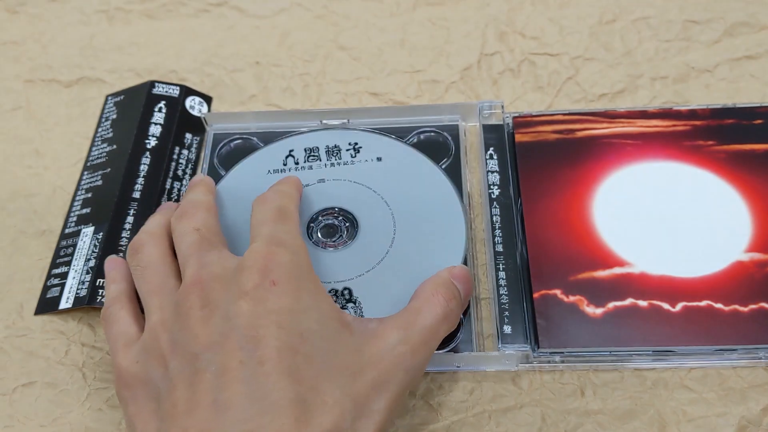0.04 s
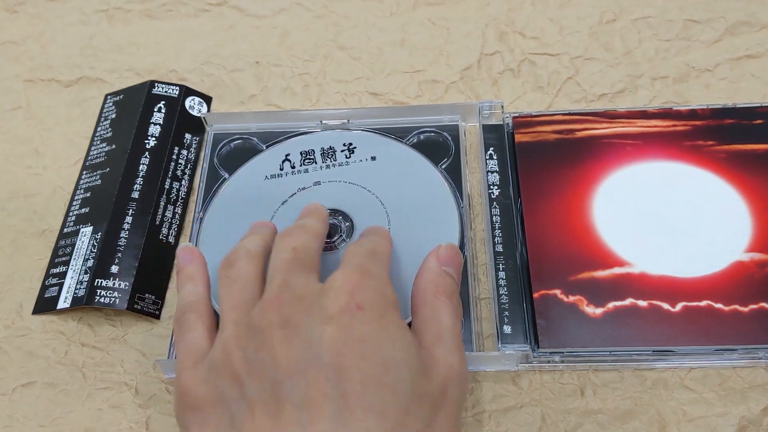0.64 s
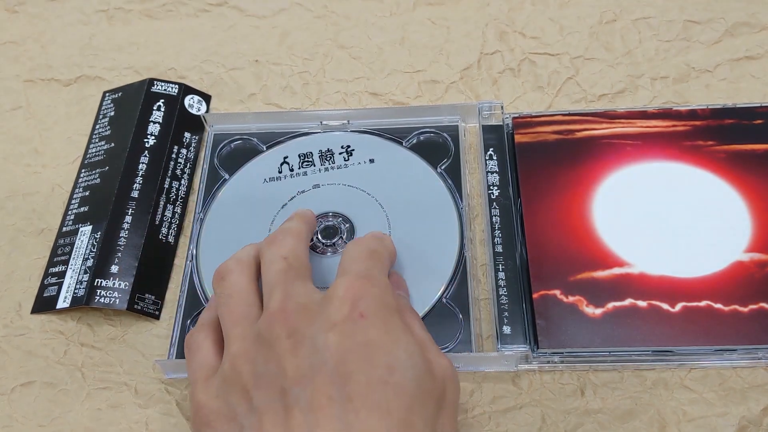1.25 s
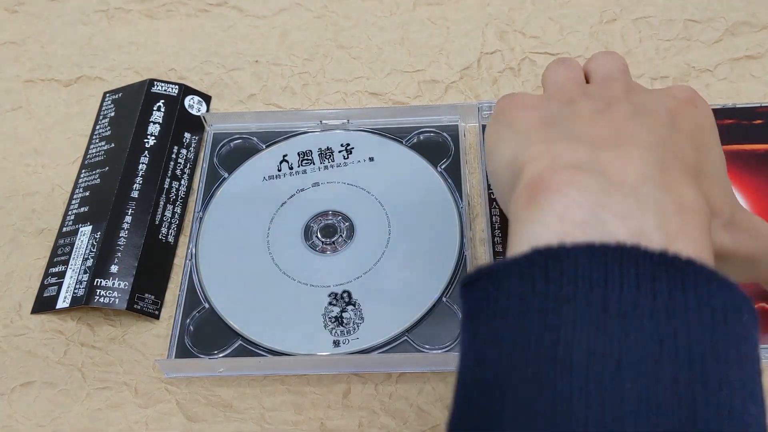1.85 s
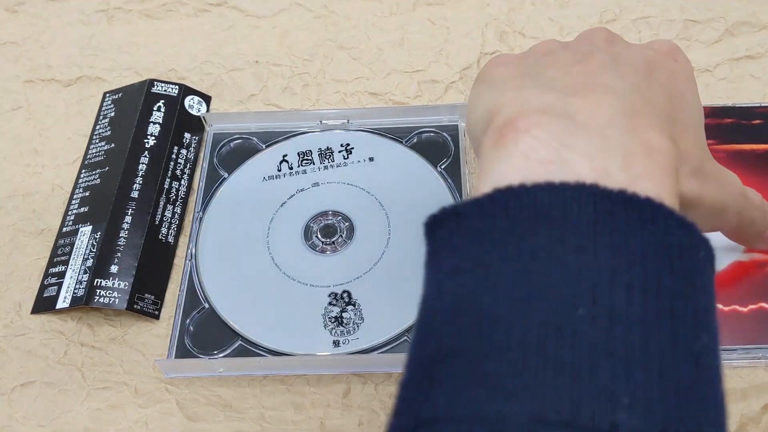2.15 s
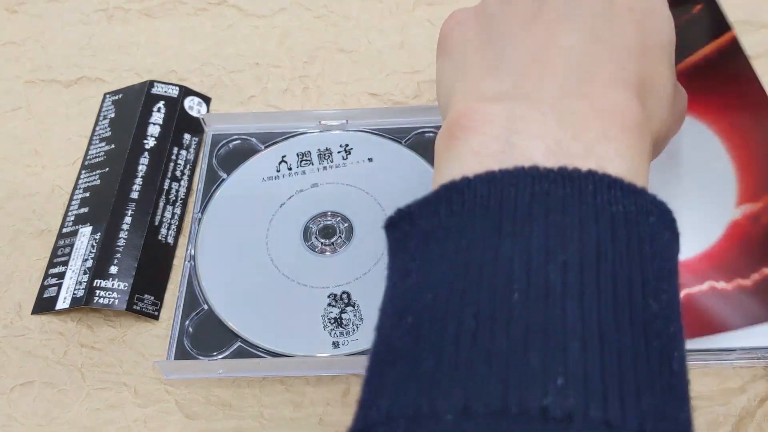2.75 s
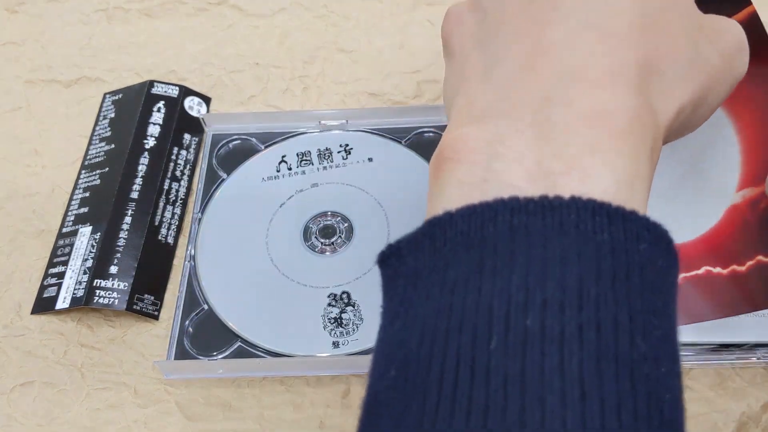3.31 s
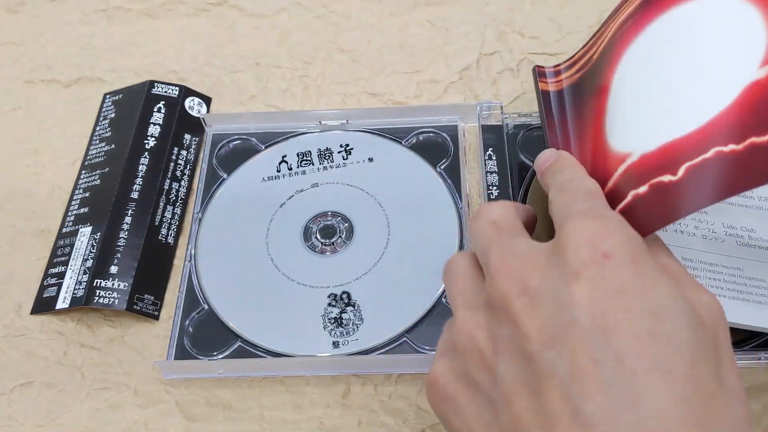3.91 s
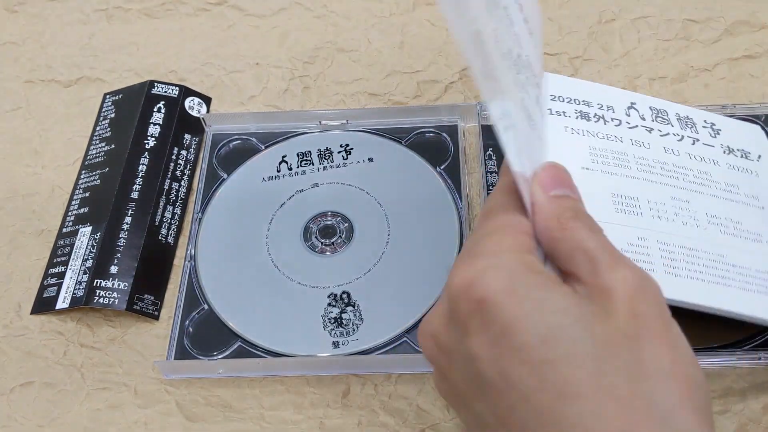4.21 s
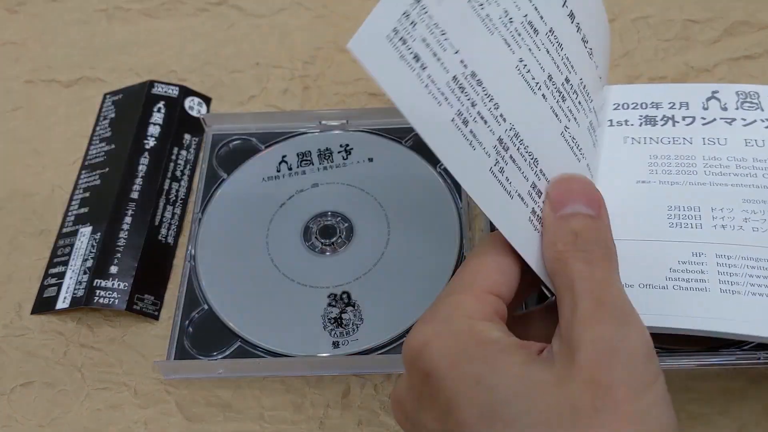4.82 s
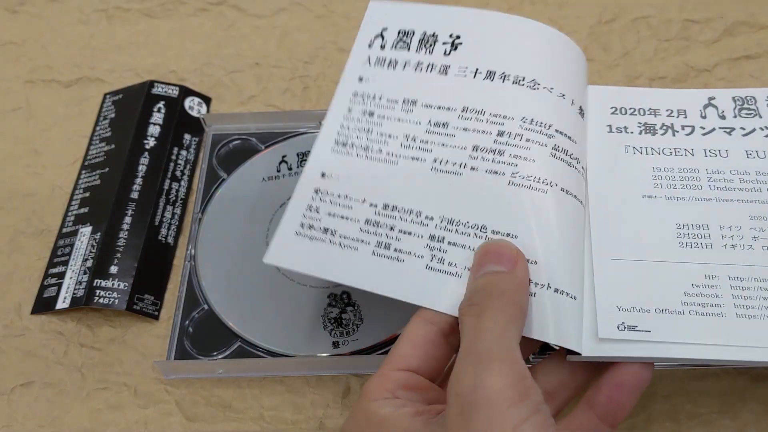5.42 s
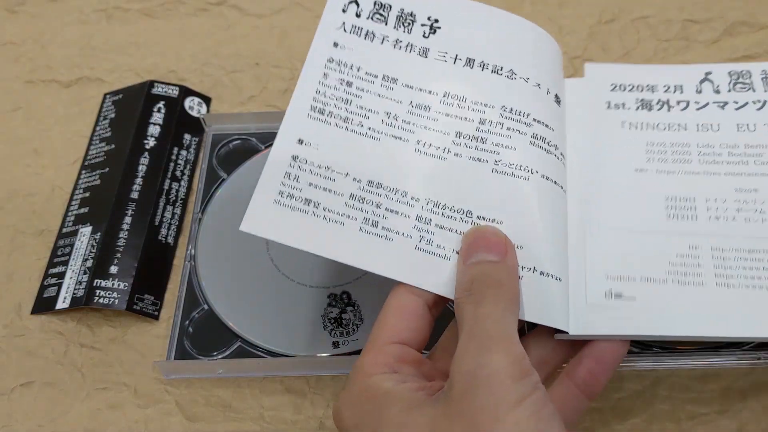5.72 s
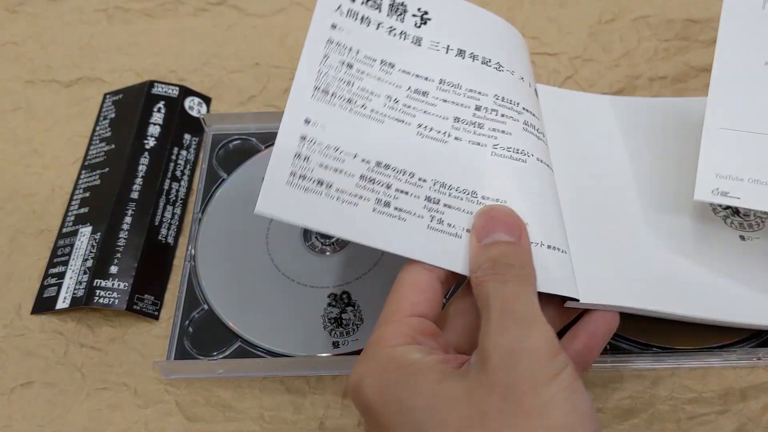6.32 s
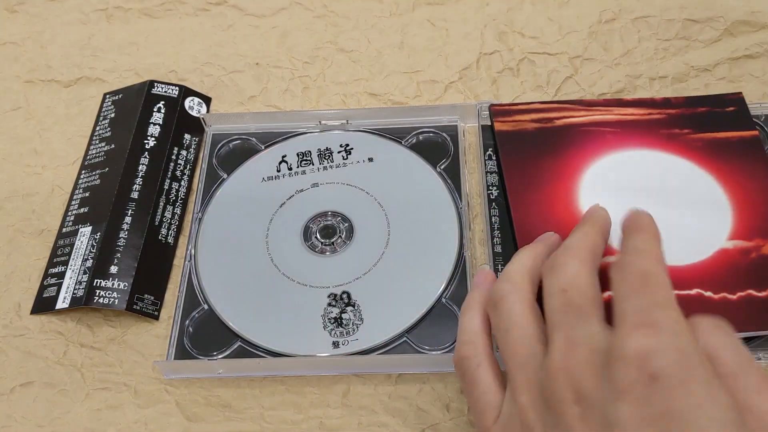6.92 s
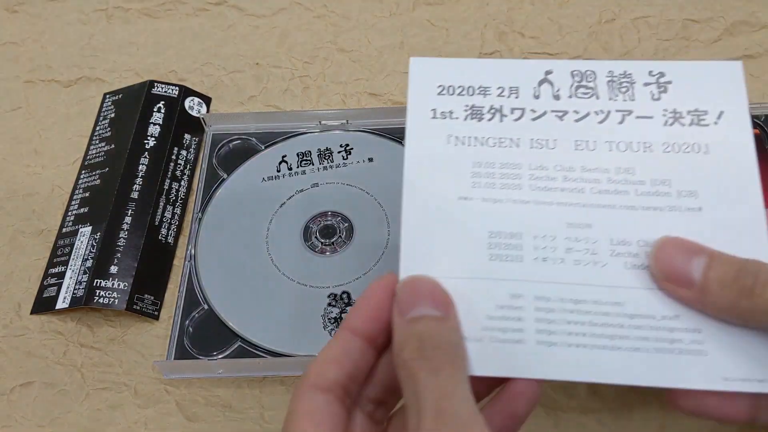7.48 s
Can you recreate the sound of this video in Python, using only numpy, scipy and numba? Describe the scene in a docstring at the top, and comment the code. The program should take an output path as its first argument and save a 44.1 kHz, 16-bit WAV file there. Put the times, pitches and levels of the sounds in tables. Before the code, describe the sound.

Fingers click a disc into a plastic case, then slide out a paper booklet and turn its stiff pages over a faint hum.

```python
"""Hands on an open plastic disc case, close up in a small room with a faint hum.
Fingers press the disc onto its hub with sharp clicks; near 1 s it snaps home and chatters in the tray.
From about 2 s the booklet slides out from under its tabs, card edges rasping, glossy faces hissing.
Then, to the end, the hands leaf through it: stiff pages rub, buckle and snap."""
import sys
import numpy as np
from scipy import signal
from scipy.fft import rfft, irfft, next_fast_len
from scipy.io import wavfile
from scipy.ndimage import uniform_filter1d
from numba import njit

SR = 44100
rng = np.random.default_rng(int(sys.argv[2]) if len(sys.argv) > 2 else 0)


def file_out(sig):
    """Save sig as 16-bit WAV at sys.argv[1]."""
    # one column per channel
    cols = np.atleast_2d(sig).T
    # limit, then scale
    lim = np.clip(cols, -1, 1)
    pcm = np.round(lim * 32767).astype(np.int16)
    wavfile.write(sys.argv[1], SR, pcm)


N = 332955

# edges of the four contact bands (frequency [Hz])
BAND_LIMITS_HZ = [250, 700, 1600, 4000, 8200]


def case_clicks():
    """Hard plastic contacts ring the disc in its tray; the low pop near 3.4 s is a page flapping."""
    # (time [s], level [dB], tilt [dB/oct], ring t60 [s], pitch of struck spot [Hz])
    clicks = [(.0443, -43, -2, .025, 3190), (.426, -31.5, 3, .034, 3270), (.4367, -35.5, -4.5, 0.023, 1770),
              (.4475, -43, 1.5, .016, 2900), (.475, -38, 0.5, .028, 1550), (.481, -39, -2, .03, 1350),
              (.7668, -42, 4.5, .012, 3440), (.9249, -43.5, 5, .005, 4260), (1.0423, -25, -1, .023, 1600),
              (1.0438, -21, -.2, .025, 3380), (1.0496, -26, 0, .036, 3440), (1.1094, -44, -3, .018, 3500),
              (1.1348, -52, -3, .013, 3520), (1.189, -28, -0.7, .0095, 1520), (1.1974, -38, 2, .025, 2150),
              (1.9353, -41.5, 4, .0045, 4530), (2.107, -47, 8, .008, 5600), (2.1492, -45, 4, .008, 4200),
              (2.1672, -50, 4, .008, 4800), (2.4581, -41, -4, .035, 2900), (2.6888, -39.5, 5.5, .01, 3900),
              (2.9034, -42, 0, .01, 5560), (3.2281, -36.5, -5, .014, 1930), (3.399, -38, -2, .055, 775),
              (3.416, -32.5, 5.5, .05, 2710), (3.4247, -36.5, -8, .04, 2500), (6.857, -46, 4, .018, 3400),
              (6.8655, -44, 0.5, .012, 4870)]
    # disc in tray (frequency [Hz], level [dB], loose-grip t60 [s])
    modes = [(291, -15.5, 0.1), (897, -9, 0.066), (1600, -2.5, 0.04), (1665, -8.5, 0.072),
             (2520, -3.5, 0.049), (2800, -27, 0.096), (3214, -7, 0.078), (3540, -7.5, 0.032),
             (3570, -6, 0.04), (4100, -2, 0.028), (5410, -7.5, 0.054), (5540, -13, 0.032), (6120, -12, .04)]
    # radiation of plastic per band (level [dB])
    tone_db = [-7, 0.5, 5.5, 3.3]
    return contacts(clicks, tone_db, lift_db=8, width_oct=0.49, modes=modes,
                    crack_db=-1, spot_db=-4, modes_db=-4, detune=0.0078, yield_s=0.0001)


def paper_snaps():
    """Stiff pages buckle, flap and tap, softer than the plastic."""
    # (time [s], level [dB], tilt [dB/oct], ring t60 [s], pitch of buckling patch [Hz])
    snaps = [(2.4012, -29, -1.5, 0.055, 2355), (2.4086, -27, -1.5, 0.017, 2650),
             (2.777, -36, 2, .049, 2770), (2.926, -30.5, 4.5, 0.046, 3340), (3.221, -44.5, 5, 0.025, 3360),
             (3.2552, -42, -3.5, 0.063, 3670), (3.5813, -31, -2.5, 0.034, 2490),
             (3.6642, -43.5, -.5, 0.022, 1430), (3.695, -37.5, 0, 0.023, 776),
             (3.9011, -46.5, 11, .069, 2260), (3.9568, -46, 1.5, .035, 760), (4.0765, -46.5, 0, .017, 900),
             (4.1099, -44.5, 6, .024, 2560), (4.7422, -40, -6.5, .025, 1070), (4.7612, -34, -5, 0.057, 917),
             (4.7786, -33.5, -8.5, 0.044, 955), (4.9935, -43, -4.5, .02, 810), (5.0086, -45, -3, .02, 1130),
             (5.0284, -42, -0.5, 0.006, 666), (5.225, -43, -0.5, 0.02, 640), (5.2742, -44, 1, 0.029, 730),
             (5.3795, -25.5, -1.5, 0.01, 955), (5.3838, -20, -.5, .019, 1070),
             (5.388, -35, -2, 0.064, 2330), (5.8969, -48, 2, 0.034, 1250), (6.2861, -35, 1, 0.034, 1150),
             (6.3862, -31, 0, 0.04, 1073), (6.4223, -46, 8.5, .016, 2460), (6.4622, -43, 5, .019, 2540),
             (6.5227, -41.5, 5, 0.018, 2210), (6.6544, -40, 3, 0.066, 2500),
             (6.671, -22.5, 0.6, 0.0077, 970), (6.681, -30, 2.5, .05, 1266), (6.697, -33.5, 0.5, .032, 714),
             (6.8104, -49, 6, .03, 2410), (7.292, -42, 2.7, 0.081, 940), (7.341, -35, -5, 0.031, 1500),
             (7.3465, -37.5, -3, 0.045, 1095)]
    # hand-held booklet (frequency [Hz], level [dB], loose-grip t60 [s])
    modes = [(490, -13.5, 0.025), (714, -2.5, 0.015), (940, 6.5, 0.036), (970, -12.5, 0.11),
             (1110, -13, 0.015), (1190, -8, 0.022), (1413, 0, 0.046), (2100, -11.5, .03),
             (2570, -4.5, 0.026), (3240, 7.5, 0.042), (4330, 6, 0.034), (4860, -9, .02)]
    # radiation of paper per band (level [dB])
    tone_db = [-3.2, 0, -0.5, -4.5]
    return contacts(snaps, tone_db, lift_db=13.5, width_oct=1.26, modes=modes,
                    crack_db=-4.5, spot_db=-9.5, modes_db=-13, detune=0.04, yield_s=0.0011)


def contacts(table, tone_db, lift_db, width_oct, **material):
    """Contacts on one object; spectrum = material tone + hardness tilt + lift at the contact's pitch."""
    edges_hz = np.array(BAND_LIMITS_HZ)
    centres_hz = np.sqrt(edges_hz[1:] * edges_hz[:-1])
    out = np.zeros(N + SR)
    for time_s, level_db, tilt_db_per_oct, ring_s, spot_hz in table:
        octaves = np.log2(centres_hz / spot_hz)
        focus_db = lift_db * np.exp(-(octaves / width_oct) ** 2)
        shape_db = np.array(tone_db) + tilt_db_per_oct * octaves + focus_db
        band_db = level_db + shape_db - 10 * np.log10(np.sum(undb(shape_db) ** 2))
        hit = shape_bands(impact(ring_s, spot_hz, **material), band_db)
        start = int(time_s * SR)
        out[start:start + len(hit)] += hit
    return out[:N]


def impact(ring_s, spot_hz, modes, crack_db, spot_db, modes_db, detune, yield_s):
    """One contact: crack, dense short ring, pitch of the struck spot, modes of the object."""
    t = np.arange(8192) / SR
    looseness = ring_s / 0.03
    fade = undb(-60 * t / ring_s)
    onset = 1 - np.exp(-t / (yield_s * looseness ** 2))  # soft, loose things give way slowly
    dense = rng.standard_normal(len(t)) * fade * onset
    spot = np.sin(2 * np.pi * spot_hz * t) * fade ** 1.75 * onset
    modal = 0
    for hz, db, t60_s in modes:
        hz = hz * (1 + detune * rng.standard_normal())  # each grip retunes
        decay = undb(db - 60 * t / (t60_s * min(looseness, 1)))  # a firm grip damps
        modal = modal + decay * np.sin(2 * np.pi * (hz * t + rng.random()))
    crack = unit(signal.unit_impulse(len(t))) / looseness ** 0.53  # stiff contacts crack more
    return unit(dense) + undb(crack_db) * crack + undb(spot_db) * unit(spot) + undb(modes_db) * unit(modal)


def sliding():
    """Card edges rasp under the tabs; glossy faces and fingertips hiss."""
    # skin and paper strokes (start [s], length [s], rasp [dB], hiss [dB])
    strokes = [(.16, 0.047, -51.5, -57), (.39, 0.14, -53.5, -64), (.71, 0.1, -52.5, -52),
               (.82, .34, -58, -55), (1.46, 0.087, -59.5, -51.5), (1.6, 0.31, -55.5, -53),
               (1.94, 0.29, -49.5, -47), (2.21, 0.14, -45.5, -44.5), (2.44, 0.17, -46.5, -55),
               (2.65, 0.041, -46.5, -49), (2.8, 0.085, -49, -41.5), (2.9, 0.22, -49.5, -48.5),
               (3.24, 0.038, -45.5, -47), (3.46, .07, -53, -50.5), (3.535, 0.037, -41.5, -40.5),
               (4.06, 0.04, -50, -54), (4.66, .06, -58, -53.5), (4.87, 0.071, -61, -48),
               (5.19, 0.05, -61, -54), (5.81, 0.091, -59, -52.5), (6.04, .085, -51.5, -45),
               (6.268, 0.033, -49, -40.5), (7.05, 0.25, -66, -69)]
    # card resonance, lower as more comes free (time [s], frequency [Hz])
    card_pitch = [(2.0, 3810), (2.3, 5370), (2.42, 3520), (2.62, 2740), (2.8, 2680), (3.05, 2270),
                  (3.55, 2530)]
    # edge rasp (frequency [Hz], level [dB])
    rasp_spectrum = [(300, -19.5), (900, -4), (1600, 5), (2300, 5), (4000, 1), (5000, 0), (8000, -5.5)]
    # face hiss (frequency [Hz], level [dB])
    hiss_spectrum = [(1200, -11), (3000, -26), (4200, -5), (5500, -4.5), (6500, -6), (8000, -8.5)]
    rasp_gain, hiss_gain = gestures(strokes, attack_s=0.01, release_s=0.027)
    pitch_hz = np.interp(np.arange(N) / SR, *np.transpose(card_pitch))
    rasp = colour(friction(rate_hz=1300, spread_db=3.5, smooth_db=-1, judder_db=2.5), rasp_spectrum)
    rasp = unit(resonance(rasp, pitch_hz, q=1.8))
    hiss = colour(friction(rate_hz=2500, spread_db=4, smooth_db=-2.5, judder_db=2.5), hiss_spectrum)
    rasp_floor, hiss_floor = undb(-73.5), undb(-64.5)  # hands never lie quite still
    return rasp * np.hypot(rasp_gain, rasp_floor) + hiss * np.hypot(hiss_gain, hiss_floor)


def page_creaks():
    """A bending page slips in small steps that the whole sheet radiates."""
    # page bends (start [s], length [s], level [dB])
    bends = [(4.745, 0.032, -42.5), (4.94, 0.059, -51), (5.12, .1, -47), (6.03, 0.059, -50),
             (6.24, 0.036, -47), (6.365, 0.055, -44), (6.69, 0.089, -49), (7.29, 0.016, -40),
             (7.345, 0.017, -49)]
    # sheet radiation (frequency [Hz], level [dB])
    spectrum = [(150, -22.5), (330, -6), (600, -8), (850, 2.5), (1250, -3.5), (1550, -12), (2000, -19.5),
                (4000, -27)]
    gain, = gestures(bends, attack_s=0.0077, release_s=0.016)
    return colour(friction(rate_hz=450, spread_db=1.5, smooth_db=-5, judder_db=2), spectrum) * gain


def disc_chatter(start_s=1.051, level_db=-36, fade_db_per_s=148):
    """The seated disc buzzes against the tray in quick, fading knocks."""
    # tray response (frequency [Hz], level [dB])
    spectrum = [(150, -23), (290, 6), (450, 4.5), (850, 2.5), (1150, -5), (1650, -12), (2200, -9),
                (3400, 1), (4200, -8), (8000, -13)]
    age_s = np.maximum(np.arange(N) / SR - start_s, 0)
    gain = gesture(start_s, length_s=0.09, attack_s=0.003, release_s=0.02)
    gain *= undb(level_db - fade_db_per_s * age_s)
    return colour(friction(rate_hz=700, spread_db=4, smooth_db=-6, judder_db=4), spectrum) * gain


def friction(rate_hz, spread_db, smooth_db, judder_db):
    """Stick-slip: tiny uneven catches over a smooth rub, under unsteady pressure."""
    sizes = undb(spread_db * np.minimum(rng.exponential(size=N), 5))
    catches = (rng.random(N) < rate_hz / SR) * rng.choice([-1, 1], N) * sizes
    rub = undb(smooth_db) * rng.standard_normal(N)
    pressure = undb(judder_db * wander(60))
    return (unit(catches) + rub) * pressure


def table_rumble():
    """Soft thumps on the table send a deep, soft rumble."""
    # table thumps (start [s], length [s], level [dB])
    thumps = [(1.39, 0.085, -40.5), (1.8, .28, -46), (4.25, .85, -50)]
    # rumble (frequency [Hz], level [dB])
    spectrum = [(12, -2), (25, 0.5), (45, -1.5), (70, -13), (130, -25.5), (300, -55), (1000, -77)]
    gain, = gestures(thumps, attack_s=0.05, release_s=0.09)
    return colour(rng.standard_normal(N), spectrum) * gain


def room(x, t60_s, wet_db, build_s, echo_s, echo_db):
    """Direct sound, one echo off the nearest wall and a diffuse tail."""
    # room response (frequency [Hz], level [dB])
    spectrum = [(120, -14), (350, -1), (700, 3), (1000, -4.5), (1500, -1), (3000, -5.5), (5500, -6),
                (8000, 0)]
    t = np.arange(SR // 2) / SR
    build = 1 - np.exp(-(t / build_s) ** 2)
    tail = colour(rng.standard_normal(len(t)), spectrum) * undb(-60 * t / t60_s) * build
    echo = uniform_filter1d(signal.unit_impulse(len(t), int(echo_s * SR)), size=5)
    response = undb(wet_db) * tail / np.sqrt(np.sum(tail ** 2)) + undb(echo_db) * echo
    return x + signal.fftconvolve(x, response)[:N]


def mains_hum(waver_db):
    """Two faint mains harmonics, each wavering in level."""
    # harmonics (frequency [Hz], level [dB])
    partials = [(100, -55), (200, -65)]
    t = np.arange(N) / SR
    hum = 0
    for hz, db in partials:
        amplitude = np.sqrt(2) * undb(db + waver_db * wander(3.4))
        hum = hum + amplitude * np.sin(2 * np.pi * (hz * t + rng.random()))
    return hum


def air_noise(level_db):
    """Steady air noise with a low rumble."""
    # room air (frequency [Hz], level [dB])
    spectrum = [(20, -1), (42, 1.5), (65, -7), (100, -4), (140, -4.5), (200, -11.5), (260, -14.5),
                (450, -18.5), (850, -20.5), (1400, -22), (2500, -24), (4200, -26.5), (6000, -32.5),
                (8000, -36.5)]
    return undb(level_db) * colour(rng.standard_normal(N), spectrum)


def gestures(table, attack_s, release_s, swell_db=3.5):
    """One gain curve per level column; a hand is fastest and loudest midway; overlaps add in power."""
    t, power = np.arange(N) / SR, 0
    for start_s, length_s, *levels_db in table:
        speed = np.sin(np.pi * np.clip((t - start_s) / length_s, 0, 1))
        gain = gesture(start_s, length_s, attack_s, release_s) * undb(swell_db * (speed - 2 / np.pi))
        power = power + np.outer(undb(levels_db), gain) ** 2
    return np.sqrt(power)


def gesture(start_s, length_s, attack_s, release_s):
    """Gain of one movement: rise, hold, decay."""
    t = np.maximum(np.arange(N) / SR - start_s, 0)
    return (1 - np.exp(-t / attack_s)) * np.exp(-np.maximum(t - length_s, 0) / release_s)


def shape_bands(x, band_db):
    """Smooth causal filter: brings each band's energy, spread over 10 ms, to band_db."""
    size = len(x)
    spectrum = rfft(x)
    hz = np.maximum(np.arange(size // 2 + 1) * SR / size, 1)
    bands = list(zip(BAND_LIMITS_HZ, BAND_LIMITS_HZ[1:]))
    log_corners = np.log([corner for lo, hi in bands for corner in (lo * 1.35, hi / 1.08)])
    # small objects radiate little bass, soft contacts little treble
    rolloff_db = np.interp(np.log(hz), np.log([60, 330, 5500, 8000]), [-19, 0.5, -0.5, -7.5])
    log_gain = np.log(undb(rolloff_db))
    for _ in range(2):
        power = 2 * np.abs(spectrum * np.exp(log_gain)) ** 2 / size / (SR / 100)
        band_rms = np.sqrt([power[(hz >= lo) & (hz < hi)].sum() for lo, hi in bands])
        log_step = np.log(undb(band_db) / band_rms)
        log_gain += np.interp(np.log(hz), log_corners, np.repeat(log_step, 2))
    cepstrum = irfft(log_gain)[:size // 2]
    cepstrum[1:] *= 2  # minimum phase
    return irfft(spectrum * np.exp(rfft(cepstrum, size)))


@njit
def resonance(x, hz, q):
    """State-variable band-pass, moving centre, unity peak gain."""
    y, band_state, low_state = np.empty(len(x)), 0., 0.
    for i in range(len(x)):
        g = np.tan(np.pi * hz[i] / SR)
        band = (band_state + g * (x[i] - low_state)) / (1 + g * (g + 1 / q))
        band_state = 2 * band - band_state
        low_state += 2 * g * band
        y[i] = band / q
    return y


def colour(x, points):
    """Filter by (frequency [Hz], level [dB]) points; rms 1."""
    hz, db = np.transpose(points)
    size = next_fast_len(len(x), True)
    bins_hz = np.maximum(np.arange(size // 2 + 1) * SR / size, 1)
    gain = undb(np.interp(np.log(bins_hz), np.log(hz), db))
    return unit(irfft(rfft(x, size) * gain, size)[:len(x)])


def wander(rate_hz):
    """Smooth random curve, rms 1."""
    hold = int(SR / rate_hz)
    steps = np.repeat(rng.standard_normal(N // hold + 1), hold)
    return unit(uniform_filter1d(steps, hold)[:N])


def undb(db):
    """Decibels to gain."""
    return 10 ** (np.asarray(db) / 20)


def unit(x):
    """Scale to rms 1."""
    return x / np.sqrt(np.mean(x ** 2))


def scene():
    """Plastic, paper and rubbing in the room, over rumble, hum and air; mono."""
    handling = case_clicks() + disc_chatter() + paper_snaps() + sliding() + page_creaks()
    in_room = room(handling, t60_s=0.3, wet_db=-10.5, build_s=0.0085, echo_s=0.0098, echo_db=-16)
    return (in_room + table_rumble() + mains_hum(waver_db=3) + air_noise(level_db=-44.5))[None]


def record(dry):
    """Steep treble cut."""
    cutoff_hz = 7720
    steep = signal.cheby1(12, 0.3, cutoff_hz, fs=SR, output="sos")
    shoulder = signal.butter(6, cutoff_hz, fs=SR, output="sos")
    return signal.sosfilt(np.vstack([steep, shoulder]), dry)


dry = scene()
out = record(dry)
file_out(out)
```